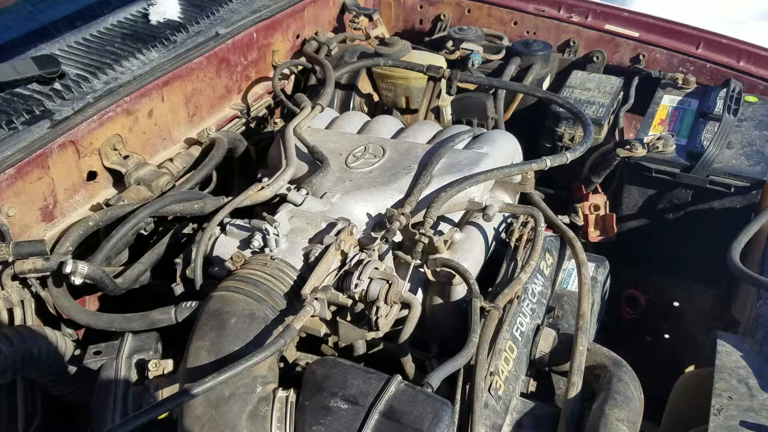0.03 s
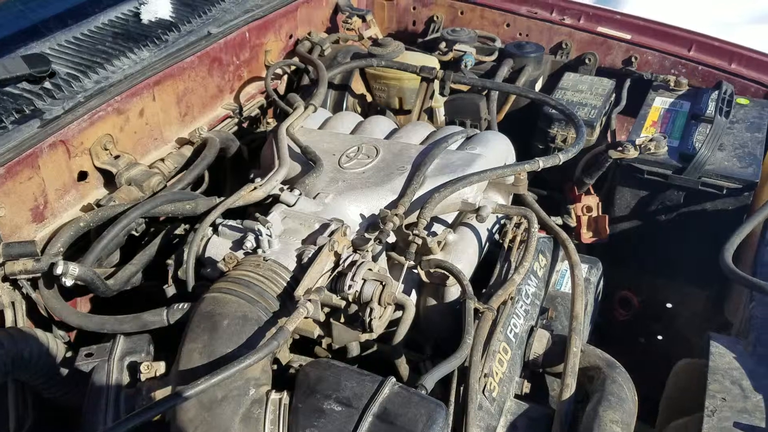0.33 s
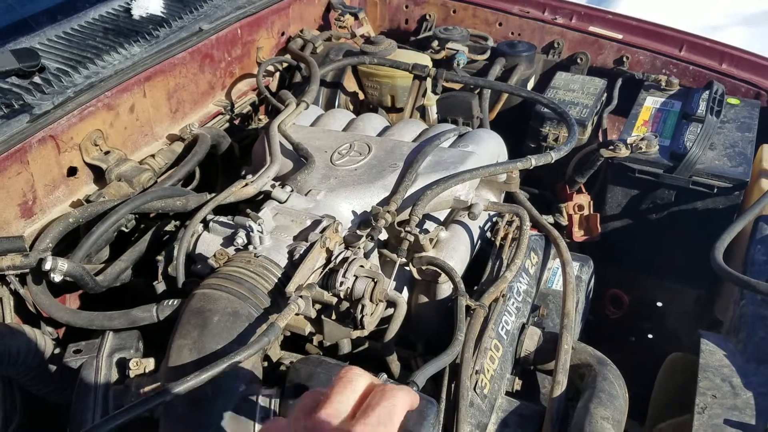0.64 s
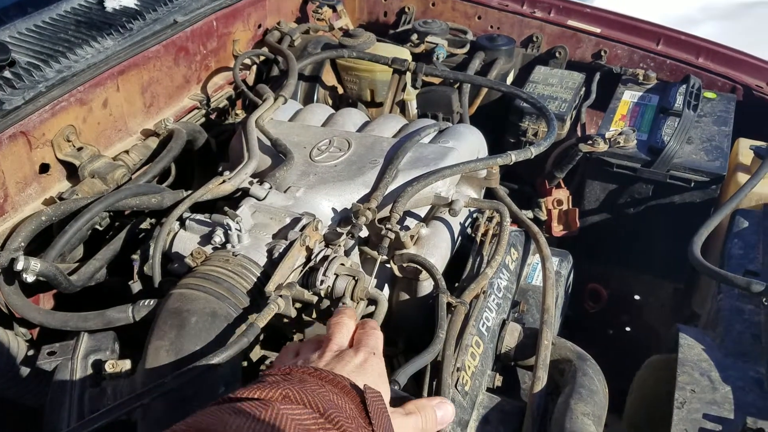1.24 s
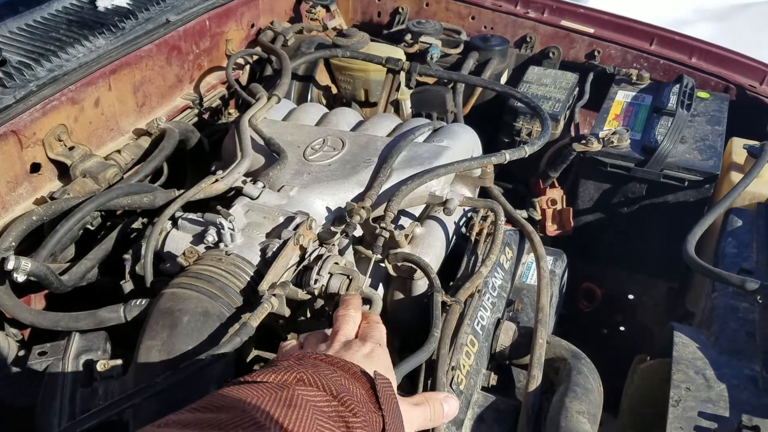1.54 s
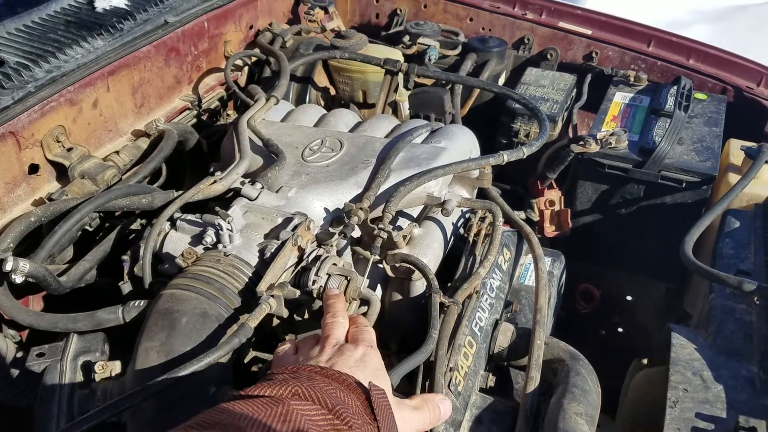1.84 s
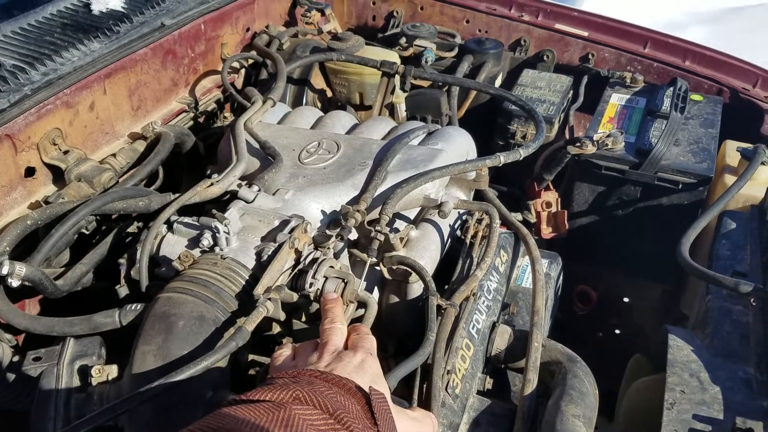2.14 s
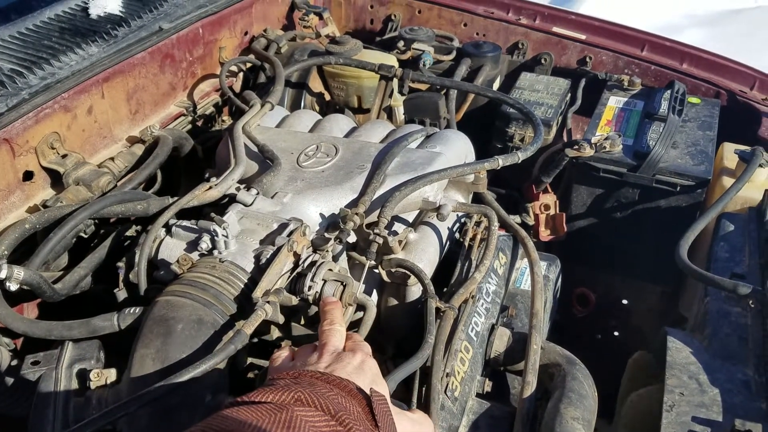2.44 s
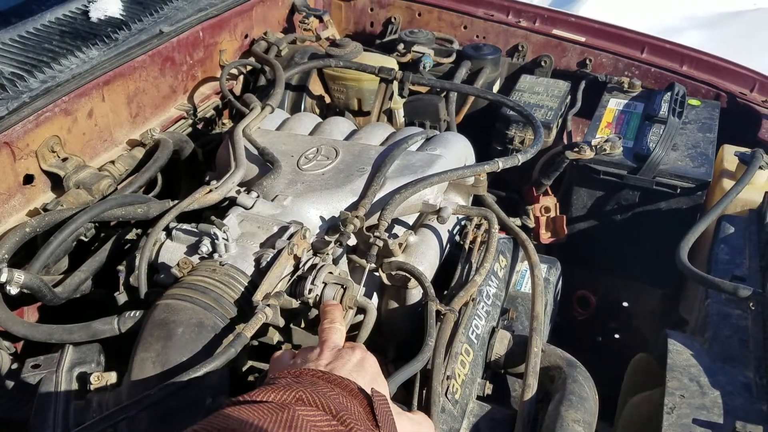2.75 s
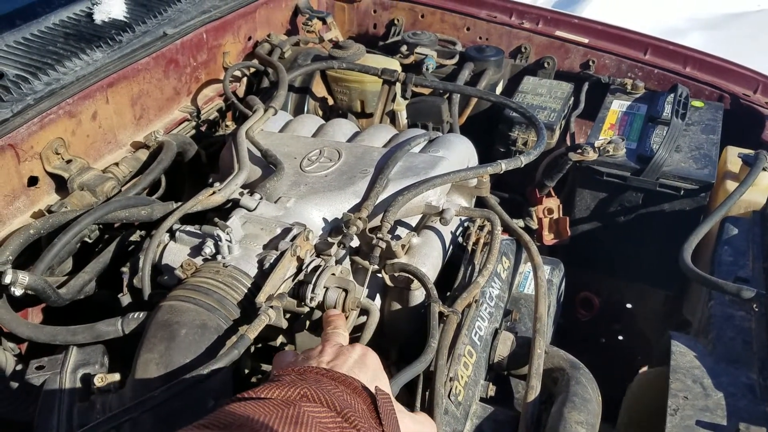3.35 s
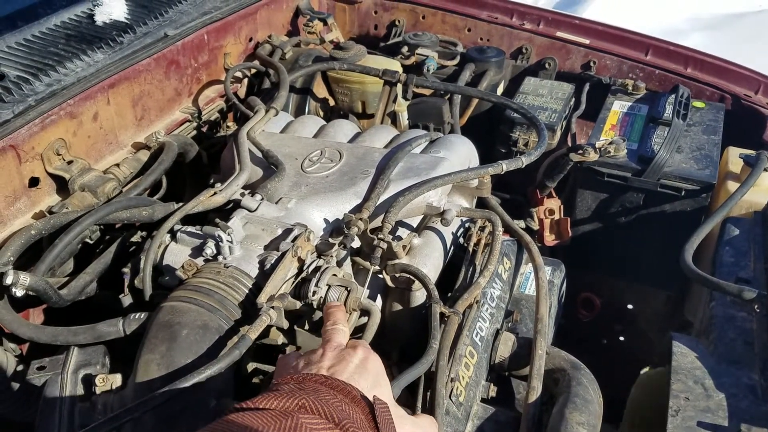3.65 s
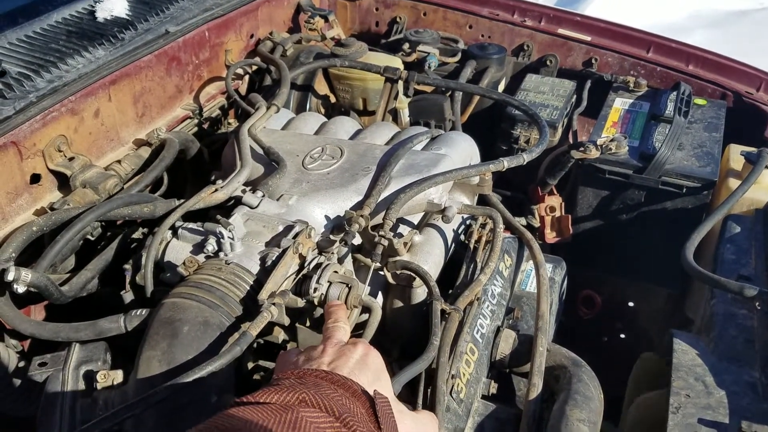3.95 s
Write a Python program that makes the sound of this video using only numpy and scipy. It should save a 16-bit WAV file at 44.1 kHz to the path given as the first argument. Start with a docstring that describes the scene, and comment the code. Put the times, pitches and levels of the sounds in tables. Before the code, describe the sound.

A car engine idles with loud, regular ticking, then revs up near the end.

```python
"""Under a car's open bonnet, heard from close above, a six-cylinder engine idles; after three seconds
a hand opens the throttle. Once per turn of the cam, the shaft that works the valves, a loose tappet
ticks loudly and a lighter tick answers it. Behind them the other valves clatter, the firings rumble
and the fan rushes. The intake hisses louder as the throttle opens. In the first second a gust
buffets the right microphone."""
import sys
import numpy as np
from scipy import signal
from scipy.fft import rfft, irfft
from scipy.io import wavfile
from scipy.ndimage import uniform_filter1d

SR = 44100
rng = np.random.default_rng(int(sys.argv[2]) if len(sys.argv) > 2 else 0)


def digitize_waveform(pressure):
    """Quantize a signal to 16-bit integers and store it at the path in sys.argv[1].

    Rows of a 2-D input are taken as channels; values are limited to [-1, 1].
    """
    field = np.atleast_2d(pressure).T
    bounded = np.clip(field, -1, 1)
    quanta = np.round(bounded * 32767).astype(np.int16)
    wavfile.write(sys.argv[1], SR, quanta)


N = 176400
T = np.arange(N) / SR
FREQS_HZ = np.arange(N // 2 + 1) * SR / N
IDLE_RPM, CYLINDERS = 1140, 6

# How far the throttle is open. Each row: time in seconds, opening from 0 (shut) to 1 (full).
THROTTLE = [(3.18, 0), (3.34, 0.64), (3.48, 0.83), (3.6, 0.44), (3.75, 0.38), (4, .25)]
# The tones that the valve cover rings with when struck. Each row: pitch in Hz, relative level in dB,
# seconds to fade by 60 dB, how far the right side lags in radians.
COVER_MODES = [(970, -8, 0.022, -3), (1350, -6, 0.024, 2.4), (1725, -5.5, 0.0083, 5),
               (2009, 2, 0.031, -0.42), (2240, 0, 0.013, 3.77), (2410, 4, 0.023, 1.36),
               (2760, -8.5, 0.038, -.4), (3210, -10, 0.024, 0.5), (4350, -3.5, 0.02, -2.5),
               (4800, -14, 0.019, 1), (5640, -12.5, 0.0044, 2.5)]
# The clatter and the light tick start a little louder. Each row: time in seconds, gain in dB.
CLATTER_SWELL = [(.1, 4), (.5, 3), (1.1, 0), (2.7, -0.9), (3.3, 0)]


def loose_tappet(turns, ring_db=-26.5, crack_db=-40, throttle_db=13):
    """A loose tappet (a valve's pusher) rings the cover and cracks, the crack harder under throttle."""
    # The quick knocks that make one tick. Each row: share of the cam turn, relative level in dB.
    knocks = [(.183, -6.5), (.22, -6), (.236, -3), (.266, -7.5)]
    # How hard the tappet strikes. Each row: time in seconds, gain in dB.
    force = [(.13, 1.5), (.45, 0), (.7, -0.5), (1.35, -0.5), (1.55, -2.5), (2.1, 0), (2.4, -3), (2.66, 0),
             (2.95, -2), (3.18, 1), (3.28, -0.5), (3.37, 2.5), (3.44, -0.5), (3.6, 3.5), (3.8, -5), (4, -2)]
    # The tone colour of the crack. Each row: frequency in Hz, relative level in dB.
    crack_spectrum = [(300, -9), (1400, 5.5), (4400, -2), (6500, -18), (11000, -16), (16000, -41)]
    clicks = contacts(turns, knocks, spread_db=1, jitter_s=.0003)
    crack = stereo_noise(crack_spectrum, fade(clicks, decay_s=.0016))
    crack *= from_db(crack_db + throttle_db * curve(THROTTLE))
    ringing = from_db(ring_db) * struck_metal(clicks, COVER_MODES)
    return pan(db=-7) * from_db(curve(force)) * (ringing + crack)


def light_tick(turns, level_db=-36):
    """Lighter knocks ring higher tones, about a third of a cam turn after the loose tappet."""
    # The knocks of this tick. Each row: share of the cam turn, relative level in dB.
    knocks = [(.503, -5.5), (.54, -5), (.6, -11.5)]
    # The tones they ring. Each row: pitch in Hz, relative level in dB, seconds to fade by 60 dB,
    # how far the right side lags in radians.
    modes = [(2470, 0, 0.047, 0.11), (3286, 8, 0.023, 1.2), (3440, -2, 0.011, -.6), (3620, 2, 0.0092, 1.6),
             (4150, -6, 0.013, -.5), (5300, -6, 0.011, 1.1), (6380, -4.5, 0.02, -1.13),
             (13000, -16, .002, 1.6)]
    clicks = contacts(turns, knocks, spread_db=1, jitter_s=.0004)
    return pan(db=-6) * from_db(level_db + curve(CLATTER_SWELL)) * struck_metal(clicks, modes)


def valve_clatter(turns, revs):
    """The other valves close in short bursts of noise and ring the cover harder as the speed rises."""
    # Where the valves close. Each row: share of the cam turn, relative level in dB.
    closings = [(.02, 1.5), (0.078, 4), (0.322, -3.5), (0.401, 4), (0.472, 0.5), (.56, -6), (0.662, -7),
                (0.757, 2), (.89, -3)]
    # The tone colour of the bursts. Each row: frequency in Hz, relative level in dB.
    spectrum = [(500, -27), (750, -5), (1000, -9), (1250, 8.5), (1480, -3.5), (1620, 7.5), (1770, -2.5),
                (1980, -1.5), (2170, -3), (2420, -1), (2900, -1), (4500, -14.5), (7000, -29.5),
                (16000, -15)]
    clicks = contacts(turns, closings, spread_db=1.2, jitter_s=.0007)
    bursts = fade(clicks, decay_s=.01) / 2 ** (revs / 2)  # coming faster does not itself add loudness
    noise = pan(db=-6) * stereo_noise(spectrum, bursts)
    noise *= effort(revs, idle_db=-30.5, doubling_db=5.5, throttle_db=6.5)
    cover = pan(db=-5) * struck_metal(clicks, COVER_MODES)
    cover *= effort(revs, idle_db=-39, doubling_db=19, throttle_db=2)
    return from_db(curve(CLATTER_SWELL)) * (noise + cover)


def block_rumble(turns, revs):
    """The engine block rumbles, throbbing each time a cylinder fires."""
    # The tone colour of the rumble. Each row: frequency in Hz, relative level in dB.
    spectrum = [(20, -38), (45, -28), (80, -3), (120, -1), (180, -5.5), (250, -2), (315, 2.5), (400, 2),
                (480, -7), (620, -5.5), (700, -6), (850, -0.5), (1050, -15), (2000, -5), (5000, -33.5)]
    rumble = stereo_noise(spectrum, firing_pulse(turns, depth_db=2.5))
    return pan(db=-3.5) * effort(revs, idle_db=-28, doubling_db=-1, throttle_db=6.5) * rumble


def engine_hum(turns, revs, doubling_db=-11):
    """Low tones follow the cam's rate, so they rise in pitch with speed while growing quieter."""
    # The tones of the hum. Each row: cycles per cam turn, level at idle in dB.
    tones = [(6, -47.5), (9, -49), (12, -50), (18, -53), (32, -47)]
    hum = 0
    for cycles, db in tones:
        level = from_db(db + 2 * drift(rate_hz=4.5))
        hum += level * np.sqrt(2) * np.sin(2 * np.pi * (cycles * turns + rng.random()))
    return pan(db=-4.5) * from_db(doubling_db * revs) * hum


def body_ring(turns, pitch_hz=906, whine_db=-38.5, wander_hz=7):
    """The body rings hollowly, throbbing with the firings; a thin whine wavers around the same pitch."""
    # How loud the ring is. Each row: time in seconds, level in dB.
    ring_level = [(.1, -41.5), (1.5, -39), (2.5, -35), (3.2, -42.5), (3.4, -40), (3.7, -42.5), (3.9, -25.5),
                  (4, -23.5)]
    hollow = narrow_noise(pitch_hz, width_hz=32, envelope=firing_pulse(turns, depth_db=2.5))
    whine_level = from_db(whine_db + 2 * drift(rate_hz=10))
    whine_hz = pitch_hz + wander_hz * drift(rate_hz=10.4)
    whine = whine_level * np.sqrt(2) * np.sin(2 * np.pi * np.cumsum(whine_hz) / SR)
    return pan(db=-4.5) * (from_db(curve(ring_level)) * hollow + whine)


def fan(turns, revs):
    """The fan's air rushes louder with speed and pulses slightly with the firings."""
    # The tone colour of the rush. Each row: frequency in Hz, relative level in dB.
    spectrum = [(200, -21.5), (600, -7.5), (1000, -0.5), (2000, 0), (3000, -8.5), (4500, -9.5),
                (7000, -18.5), (16000, -38)]
    rush = stereo_noise(spectrum, firing_pulse(turns, depth_db=1))
    return pan(db=-3.5) * effort(revs, idle_db=-27.5, doubling_db=8.5, throttle_db=0) * rush


def intake(revs, whistle_db=-44):
    """Air hisses into the engine and whistles faintly past the throttle plate when it opens."""
    # The tone colour of the hiss. Each row: frequency in Hz, relative level in dB.
    spectrum = [(3000, -11), (6500, -15), (8000, 2), (10000, 1.5), (12500, 5), (14300, 4.5), (16000, -4)]
    hiss = effort(revs, idle_db=-40, doubling_db=-.5, throttle_db=5.5) * stereo_noise(spectrum)
    whistle = np.array([narrow_noise(hz=14250, width_hz=260) for side in "LR"])
    return pan(db=2.5) * hiss + from_db(whistle_db) * curve(THROTTLE) * whistle


def wind(lumpy_db=2, left_db=-11, ceiling=.7):
    """A gust hits mostly the right microphone, making lumpy low noise and a few sharp thumps."""
    # The strength of the gust. Each row: time in seconds, level in dB.
    strength = [(.1, -34), (.17, -18), (.3, -22), (.37, -24), (.395, -5.5), (.44, -23.5), (.52, -10.5),
                (.58, -16), (.64, -12.5), (.75, -23.5), (.83, -22), (.95, -48), (1.1, -70)]
    # Its tone colour. Each row: frequency in Hz, relative level in dB.
    spectrum = [(20, -15), (55, -5.5), (110, 0.5), (200, -1), (330, -9.5), (550, -19.5), (1200, -26),
                (4000, -57)]
    # Single thumps. Each row: time of the peak in seconds, level in dB, pitch in Hz, half-width in seconds.
    buffets = [(.153, -9, 300, 0.0014), (.397, -1.5, 182, .01), (.465, 5.5, 370, 0.00096),
               (0.509, -7, 112, 0.0035)]
    lumps = from_db(lumpy_db * drift(rate_hz=60))
    left, right = from_db(curve(strength)) * stereo_noise(spectrum, lumps)
    for peak_s, db, hz, half_width_s in buffets:
        envelope = from_db(db) * np.exp(-((T - peak_s) / half_width_s) ** 2)
        right += envelope * np.cos(2 * np.pi * hz * (T - peak_s))
    gust = np.array([from_db(left_db) * left, right])
    return ceiling * np.tanh(gust / ceiling)  # rounds off the peaks


def contacts(turns, knocks, spread_db, jitter_s):
    """A click wherever the cam passes a listed point, never twice quite the same in time or force."""
    clicks = np.zeros(N)
    for share, db in knocks:
        times_s = np.interp(np.arange(60) + share, turns, T, right=-1)  # turns never reached drop out
        late, harder = rng.standard_normal((2, len(times_s)))
        samples = ((times_s + jitter_s * late) * SR).astype(int)
        inside = (samples > 0) & (samples < N)
        clicks[samples[inside]] += from_db(db + spread_db * harder)[inside]
    return clicks


def struck_metal(clicks, modes, scatter_s=.001, scatter_share=.7):
    """Each click scatters through the top of the engine and rings the metal, as loud as it is hard."""
    scatter = fade(clicks, scatter_s) * rng.standard_normal(N) * np.sqrt(2 / (scatter_s * SR))
    drive = rms_one(clicks + scatter_share * scatter)
    ringing = 0
    for hz, db, fade_s, lag in modes:
        ringing += from_db(db) * (ring(drive, hz, fade_s) * np.exp([[0], [-1j * lag]])).imag
    click_power = smooth(rms_one(clicks) ** 2)
    ring_power = smooth(np.mean(rms_one(ringing) ** 2, axis=0))
    return rms_one(ringing * np.sqrt((click_power + 1e-3) / (ring_power + 1e-3)))


def firing_pulse(turns, depth_db):
    """A gain that swings up and down once per firing; every cylinder fires once per cam turn."""
    return from_db(depth_db * np.cos(2 * np.pi * CYLINDERS * turns))


def effort(revs, idle_db, doubling_db, throttle_db):
    """A layer's gain: its idle level, plus a change per doubling of speed and one for full throttle."""
    return from_db(idle_db + doubling_db * revs + throttle_db * curve(THROTTLE))


def stereo_noise(spectrum, envelope=1):
    """Noise shaped in time and tone colour, as alike on both sides as the engine bay makes it."""
    # How alike left and right are. Each row: frequency in Hz, likeness from -1 (opposite) to 1 (same).
    likeness = [(60, 0.72), (170, 0.13), (300, 1), (400, 0.64), (500, 0.55), (850, 0.67), (1050, 0.37),
                (1250, -0.38), (1620, -0.21), (2000, 0.14), (2500, .3), (3200, 0.014), (16000, -0.027)]
    alike = np.clip(across_frequency(likeness), -.98, .98)
    mid, side = rfft(rng.standard_normal((2, N)) * envelope)
    both = np.sqrt(1 + alike) * mid + np.sqrt(1 - alike) * side * [[1], [-1]]
    return rms_one(irfft(both * from_db(across_frequency(spectrum)), N))


def narrow_noise(hz, width_hz, envelope=1):
    """Noise through one resonance, which gives it a pitch."""
    fade_s = np.log(1000) / (np.pi * width_hz)
    return rms_one(ring(envelope * rng.standard_normal(N), hz, fade_s).imag)


def ring(drive, hz, fade_s):
    """One resonance that fades by 60 dB in fade_s; the imaginary part of the result is its sound."""
    step = from_db(-60 / (fade_s * SR)) * np.exp(2j * np.pi * hz / SR)
    return signal.lfilter([1], [1, -step], drive + 1e-18)


def fade(clicks, decay_s):
    """Give each click a tail that dies away."""
    return signal.lfilter([1], [1, -np.exp(-1 / (decay_s * SR))], clicks + 1e-18)


def drift(rate_hz):
    """A slow random wander, typically about 1 in size."""
    return rms_one(irfft(rfft(rng.standard_normal(N)) / (1 + (FREQS_HZ / rate_hz) ** 2), N))


def smooth(x, samples=1500):
    """Average over a few hundredths of a second."""
    return np.abs(uniform_filter1d(uniform_filter1d(x, samples), samples))


def curve(rows):
    """Join rows of time and value into one value per sample."""
    return np.interp(T, *np.transpose(rows))


def across_frequency(rows):
    """Join rows of frequency and value, giving each octave equal room."""
    hz, values = np.transpose(rows)
    return np.interp(np.log(FREQS_HZ + 1), np.log(hz), values)


def pan(db):
    """Left and right gains at constant power; negative dB leans to the right."""
    return rms_one(from_db([[db / 2], [-db / 2]]))


def from_db(db):
    """Turn decibels into a gain."""
    return 10 ** (np.asarray(db) / 20)


def rms_one(x):
    """Scale to an average power of 1."""
    return x / np.sqrt(np.mean(x ** 2) + 1e-20)


def scene():
    """The engine turns the cam, which times every knock and firing; air and wind join in."""
    # The engine's speed. Each row: time in seconds, revolutions per minute.
    speed = [(0.0, 1137.5), (0.45, 1148.6), (0.65, 1124.5), (1.2, 1139.6), (2.1, 1136.8), (2.7, 1147.0),
             (3.1, 1149.2), (3.22, 1180.2), (3.4, 1606.4), (3.52, 1984.6), (3.62, 2064.8), (3.78, 1991.8),
             (3.9, 1785.3), (4.0, 1962.3)]
    rpm = curve(speed)
    turns = np.cumsum(rpm) / (2 * 60 * SR)  # cam turns so far, one for every two of the engine
    revs = np.log2(rpm / IDLE_RPM)  # doublings of speed above idle
    valves = loose_tappet(turns) + light_tick(turns) + valve_clatter(turns, revs)
    block = block_rumble(turns, revs) + engine_hum(turns, revs) + body_ring(turns)
    return valves + block + fan(turns, revs) + intake(revs) + wind()


def record(dry, start_s=.104, cutoff_hz=15850):
    """The sound cuts in, peaks are clipped at full scale and the highest treble is removed."""
    clipped = np.clip(dry * (T > start_s), -1, 1)
    low_pass = np.clip((cutoff_hz - FREQS_HZ) / 200 + .5, 0, 1)
    return irfft(rfft(clipped) * low_pass, N)


dry = scene()
out = record(dry)
digitize_waveform(out)
```